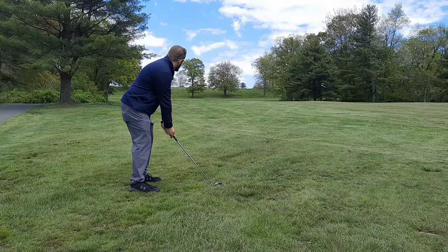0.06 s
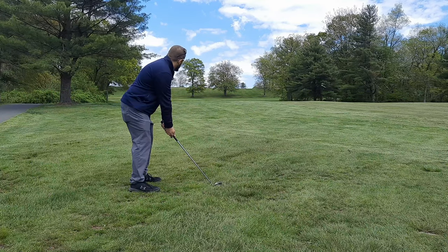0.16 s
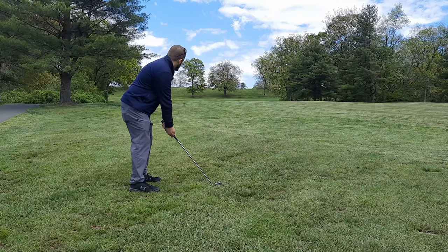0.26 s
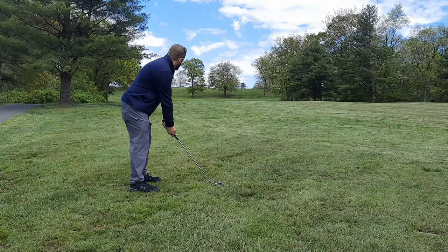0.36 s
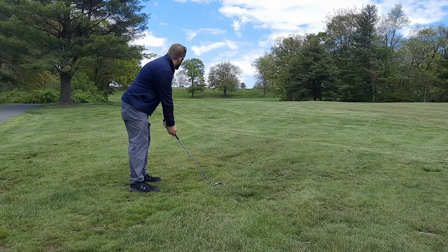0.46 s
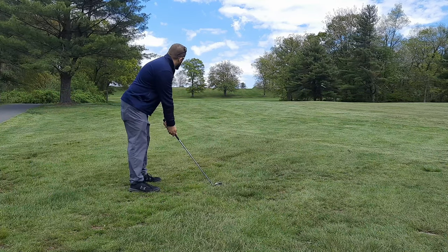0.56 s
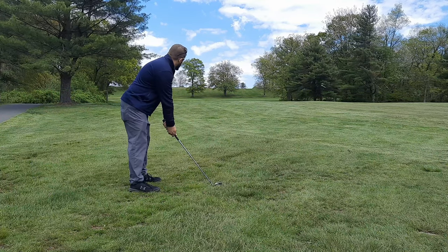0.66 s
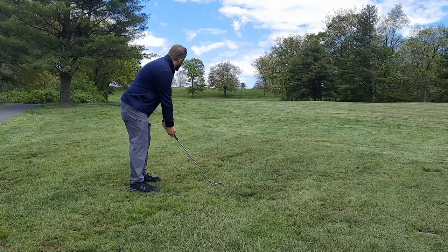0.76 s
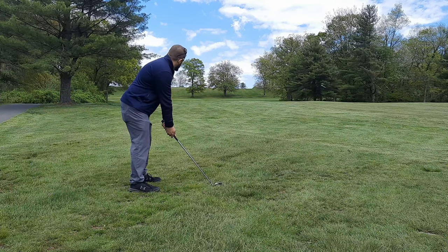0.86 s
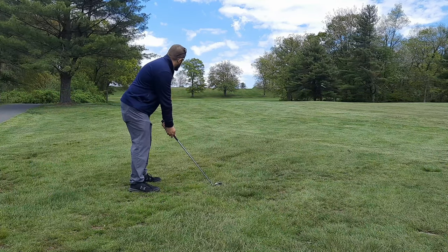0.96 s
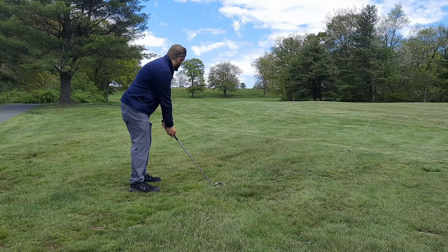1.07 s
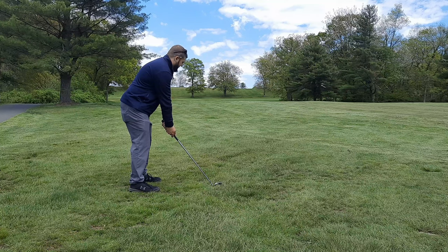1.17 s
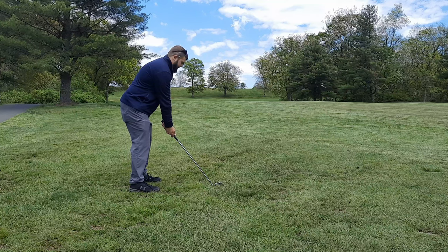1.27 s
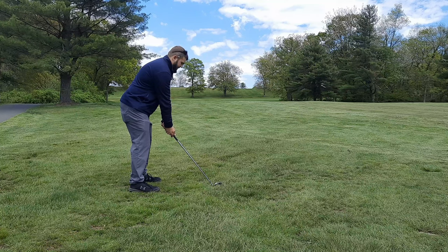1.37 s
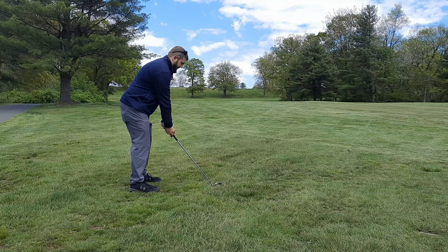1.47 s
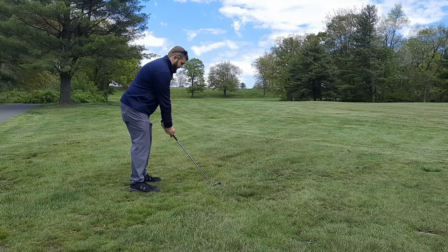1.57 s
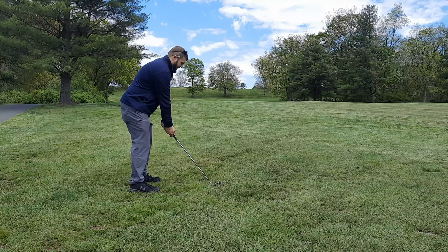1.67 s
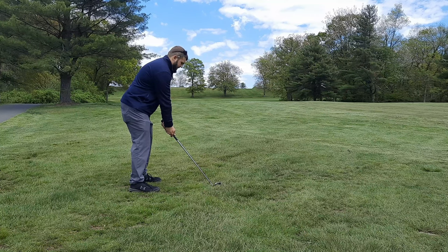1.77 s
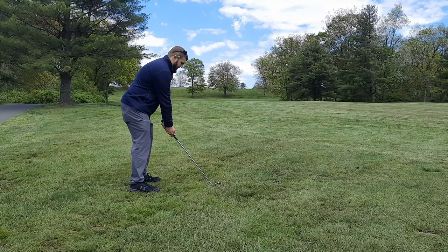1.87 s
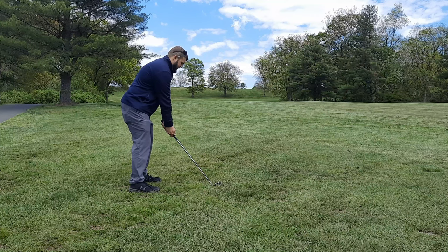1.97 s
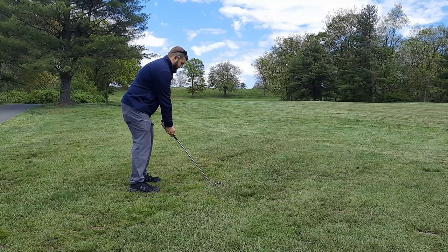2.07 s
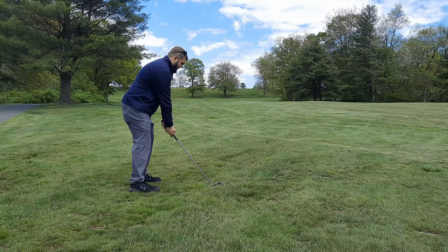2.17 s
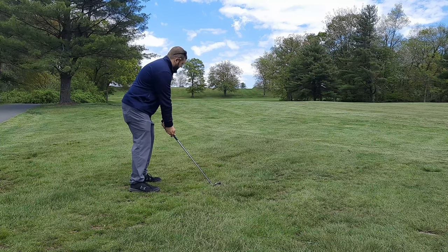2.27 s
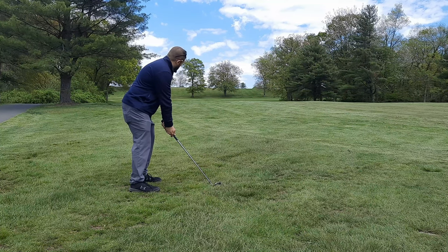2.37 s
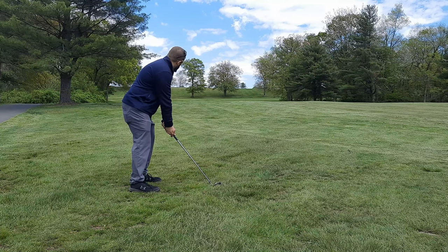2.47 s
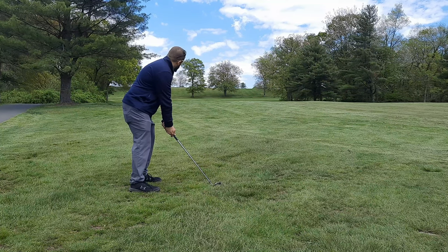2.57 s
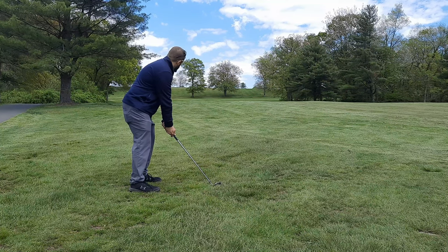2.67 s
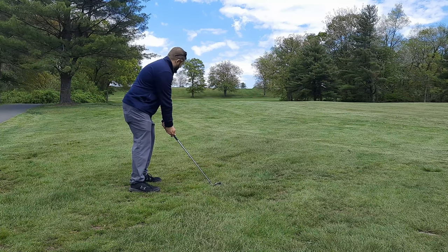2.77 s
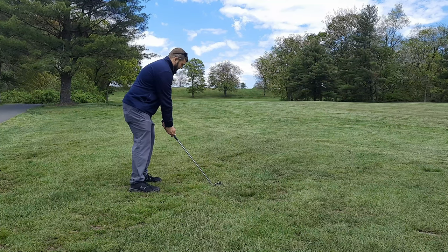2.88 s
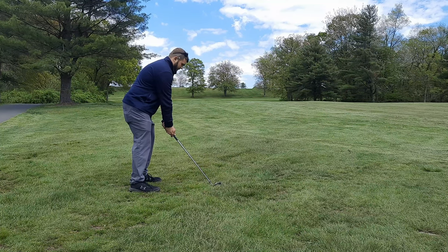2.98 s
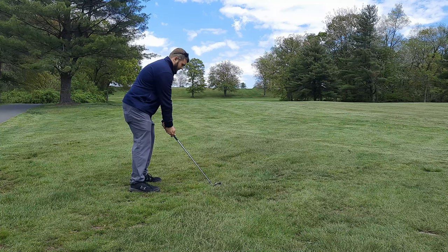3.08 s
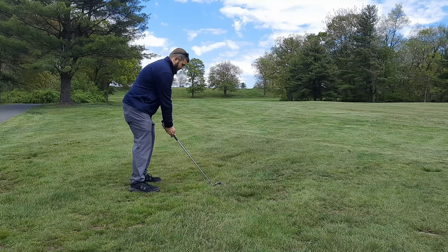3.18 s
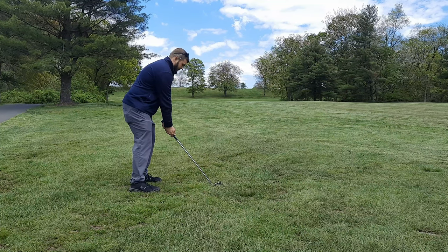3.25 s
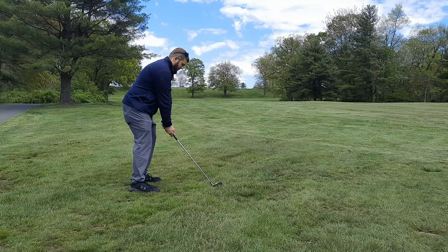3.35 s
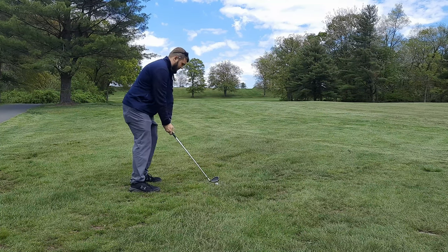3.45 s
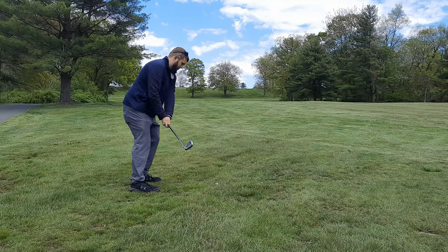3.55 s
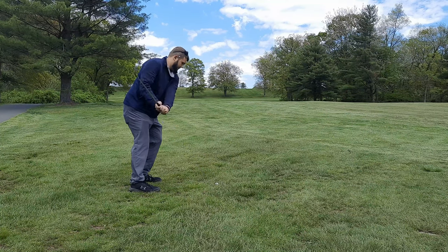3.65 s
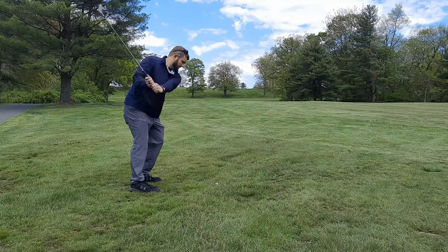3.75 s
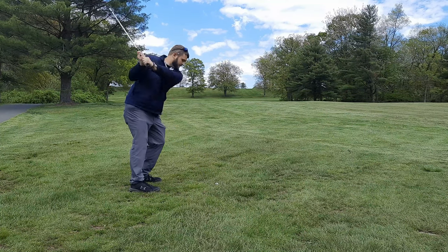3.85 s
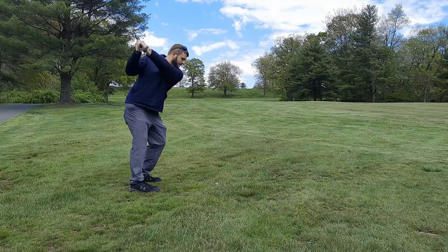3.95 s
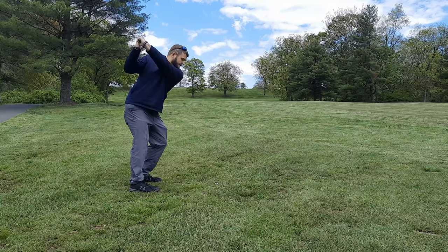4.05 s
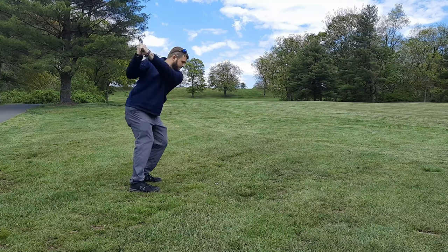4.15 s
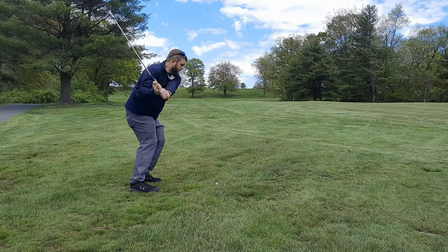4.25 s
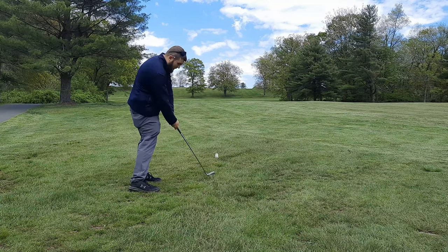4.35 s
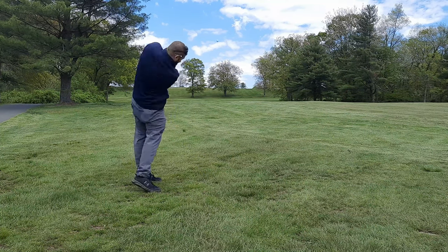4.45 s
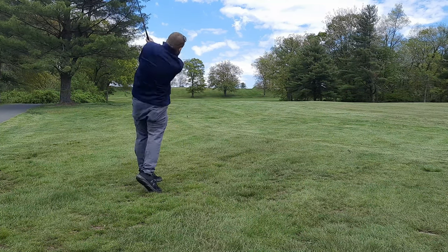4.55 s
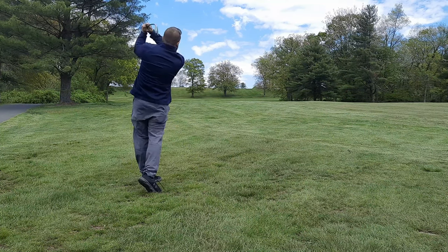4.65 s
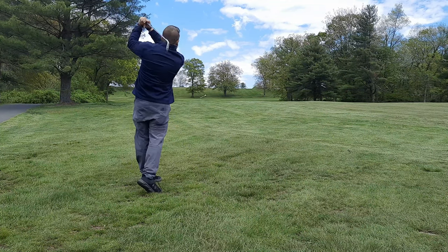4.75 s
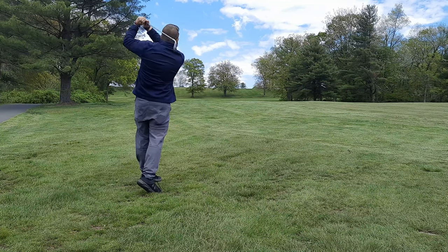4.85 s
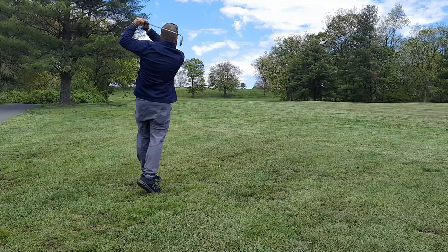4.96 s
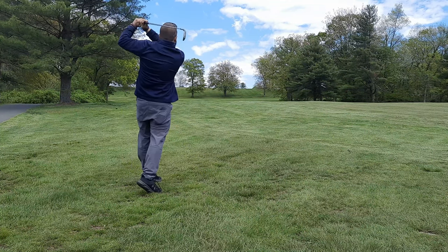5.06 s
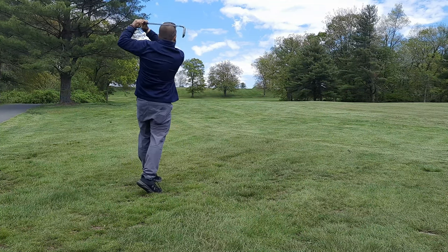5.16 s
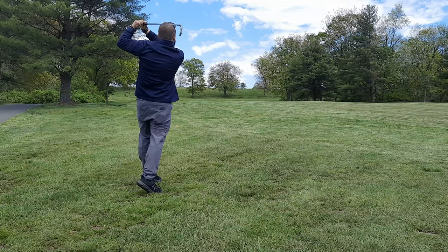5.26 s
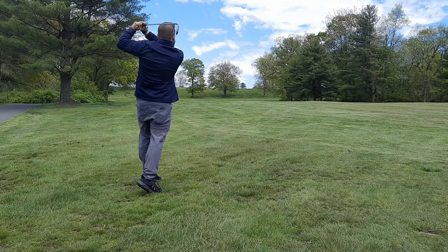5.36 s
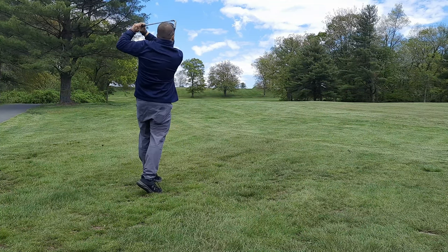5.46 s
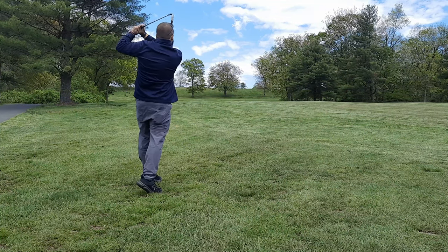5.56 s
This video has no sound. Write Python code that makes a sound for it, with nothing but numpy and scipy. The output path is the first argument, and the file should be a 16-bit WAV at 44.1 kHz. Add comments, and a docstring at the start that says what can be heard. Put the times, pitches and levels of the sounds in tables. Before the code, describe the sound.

Distant lawn mowers hum steadily on an open fairway, with a faint thin whine and a few tiny bird chirps. After about four seconds a golf club swishes down and hits the ball with one sharp crack, thumping and tearing the turf. Bits of grass patter down, the trees return a faint dull echo, and a bird softly whistles twice. The stereo microphone stands a few metres away.

```python
"""Iron shot on a quiet fairway

A stereo microphone stands a few metres from the ball. Far off to the left mowers hum, with a thin
whine behind them, and small birds call from the trees. The club brushes the grass on the takeaway,
swishes down, cracks against the ball and tears into the turf. Bits of grass fall back, the tree line
returns a dull echo and the golfer's shoe and clothes settle."""
import sys
import numpy as np
from scipy import signal
from scipy.fft import rfft, irfft, next_fast_len
from scipy.io import wavfile

SR = 44100
rng = np.random.default_rng(int(sys.argv[2]) if len(sys.argv) > 2 else 0)


def unload_wav(signal):
    """Save mono or channel-first audio to the path in sys.argv[1] as 16-bit WAV at rate SR, clipped to [-1, 1]."""
    wavfile.write(
        sys.argv[1],
        SR,
        np.round(np.clip(np.atleast_2d(signal).T, -1, 1) * 32767).astype(np.int16),
    )


N = 247785
TIME = np.arange(N) / SR
IMPACT_S = 4.5014
MOWER_LAG_S = .00052   # the mowers reach the right channel this much later

# distant rumble: (frequency [Hz], relative level [dB])
RUMBLE_SPECTRUM = [(20, -23), (38, -16), (60, 1.5), (95, -3.5), (125, 5), (170, -6.5), (215, -9),
                   (280, -2.5), (340, -7.5), (410, -15), (520, -22.5), (660, -24.5), (900, -28),
                   (1400, -45.5)]
# open air and leaves: (frequency [Hz], relative level [dB])
AIR_SPECTRUM = [(300, 1), (800, 8), (1500, -4.5), (2150, -5), (2800, -9.5), (4500, -15), (7000, -18.5),
                (9500, -21), (12500, -16.5), (15500, -16.5)]
# stereo width of far sounds: (frequency [Hz], side minus mid [dB])
FAR_WIDTH = [(60, -22.5), (150, -9.5), (350, -5.5), (1000, -6.5), (2500, -1.5), (6000, 0.5)]
# stereo width at the golfer's spot: (frequency [Hz], side minus mid [dB])
NEAR_WIDTH = [(500, -12), (2000, -0.5), (4500, -1.5), (10000, -1)]
# the far whine's narrow, raspy band: (frequency [Hz], relative level [dB])
WHINE_SPECTRUM = [(1900, -40), (2090, -14), (2148, 0), (2210, -13), (2400, -40)]
# swells of the whine: (time [s], relative level [dB], hold [s])
WHINE_SURGES = [(1.48, -92, .09), (3.133, -82, .34)]
# the far engine's firing tone fading in and out: (time [s], level [dB])
FIRING_LEVELS = [(0, -45), (0.55, -45.0), (2.1, -49), (2.8, -42.5), (3.3, -44), (3.85, -41.1), (5.2, -54),
                 (5.62, -43.5)]
# its octave, fading on its own: (time [s], level [dB])
OCTAVE_LEVELS = [(0, -52), (0.75, -60), (1.25, -50.3), (1.65, -58), (2.25, -47), (3.1, -50), (4.15, -56.5),
                 (4.7, -47), (5.62, -50)]
# higher engine orders in the drone: (multiple of the firing rate, relative level [dB])
DRONE_ORDERS = [(3, -3), (4, -4), (5, -17), (8, -23)]
# one bird's long whistles, sagging onto their pitch: (time [s], relative level [dB])
BIRD_WHISTLES = [(4.75, -72), (5.172, -69.5)]
# another bird's short chirps: (time [s], relative level [dB], direction [+1 up, -1 down])
BIRD_CHIRPS = [(.298, -85, 1), (1.448, -79.5, 1), (1.535, -85, 1), (4.942, -82, 1), (5.285, -84, -1),
               (5.395, -84, -1)]
# the strike coming back from the trunks: (delay [s], relative level [dB])
TRUNK_ECHOES = [(.163, -45), (.2245, -34), (.2345, -38)]
# jacket sleeves sliding in the backswing: (frequency [Hz], relative level [dB])
SLEEVE_SPECTRUM = [(1200, -4), (2500, -4), (3600, -1.5), (4800, -15), (9000, -17.5)]
# shoe and clothes settling in the finish: (frequency [Hz], relative level [dB])
SETTLING_SPECTRUM = [(350, -10), (550, 0), (900, -0.5), (1400, -19.5), (3000, -25.5), (12000, -34)]
# the swish, with the shaft's whistle near 600 Hz: (frequency [Hz], relative level [dB])
SWISH_SPECTRUM = [(200, -16), (480, -6.5), (610, 3.5), (800, -13.5), (1100, -9), (1550, -5), (2900, -19),
                  (6500, -25.5), (9000, -36), (15000, -33.5)]
# grass brushed, torn and falling back, and the crack's short fizz: (frequency [Hz], relative level [dB])
GRASS_SPECTRUM = [(300, -6.5), (900, -6), (2500, 3.5), (4200, -3), (6500, -3), (9300, -13), (12500, -8.5),
                  (15500, -12.5)]
# the soil's thump: (frequency [Hz], relative level [dB])
SOIL_SPECTRUM = [(110, -1), (135, 1), (220, -7), (335, 3), (430, -4), (520, -6), (680, -3), (1200, -20)]
# tufts of the divot landing: (time [s], level [dB])
FALLING_TUFTS = [(4.637, -57.5), (4.686, -67), (4.779, -70)]
# the head hitting ball and ground: (time [s], snap level [dB], relative ring level [dB])
HEAD_CONTACTS = [(4.50119, -0.5, -16), (4.5021, -9, -22.5), (4.511, -20, -32)]
# ringing modes of head and ball: (frequency [Hz], relative level [dB], t60 [s])
HEAD_BALL_MODES = [(325, -14, .06), (690, 2, .017), (1090, 1, .017), (1500, -8, .009), (2060, 5, .016),
                   (2550, -11, .045), (2790, -14, .04), (3260, -10, .014), (4100, -18, .022),
                   (4640, -16, .016), (5850, -12, .012), (6650, -14, .018), (7810, -15, .022),
                   (11700, -21, .025), (12700, -18, .022)]


def from_db(db):
    """Decibels to gain."""
    return 10 ** (np.asarray(db) / 20)


def unit_rms(x):
    """Scale to rms 1."""
    return x / np.sqrt(np.mean(x ** 2) + 1e-20)


def at_hz(points, hz):
    """Read a spectrum on a log-frequency axis."""
    point_hz, level_db = np.transpose(points)
    return np.interp(np.log(hz), np.log(point_hz), level_db)


def drift(rate):
    """A smooth random curve of rms about 1, changing about `rate` times a second."""
    step, run_in = 40, 2000
    pole = np.exp(-2 * np.pi * rate * step / SR)
    white = rng.standard_normal(N // step + run_in + 2)
    slow = signal.lfilter([1], [1, -2 * pole, pole ** 2], white)[run_in:]
    return np.interp(np.arange(N) / step, np.arange(len(slow)), unit_rms(slow))


def noise(spectrum, width=NEAR_WIDTH, tilt_db=0, lag_s=0):
    """Coloured stereo noise of rms 1, tilted by tilt_db per octave, the right channel lag_s later."""
    size = next_fast_len(N)
    hz = np.maximum(np.arange(size // 2 + 1) * SR / size, 1)
    skirts = np.minimum(hz / spectrum[0][0], 1) ** 2 * np.minimum(spectrum[-1][0] / hz, 1) ** 2
    gain = skirts * from_db(at_hz(spectrum, hz) + tilt_db * np.log2(hz))
    mid, side = rfft(rng.standard_normal((2, size)))
    spread = from_db(at_hz(width, hz))
    left = mid + spread * side
    right = (mid - spread * side) * np.exp(-2j * np.pi * hz * lag_s)
    return unit_rms(irfft(gain * np.array([left, right]) / np.sqrt(1 + spread ** 2), size)[:, :N])


def burst(peak_s, level_db, rise, t60, hold=0):
    """An envelope that climbs its last 10 dB in `rise` seconds, holds and dies away."""
    early = np.maximum(peak_s - TIME, 0)
    late = np.maximum(TIME - peak_s - hold, 0)
    return from_db(level_db - np.minimum(60 * late / t60 + 10 * (early / rise) ** 2, 200))


def ring(clicks, hz, t60):
    """A unit click sets a sine of height 1 ringing."""
    radius, angle = 10 ** (-3 / (t60 * SR)), 2 * np.pi * hz / SR
    feedback = [1, -2 * radius * np.cos(angle), radius ** 2]
    return signal.lfilter([0, np.sin(angle)], feedback, clicks + 1e-18)


def far_tone(hz):
    """A stereo sine of rms 1 on a pitch curve, arriving from the mowers' side."""
    cycles = np.cumsum(hz) / SR + rng.random()
    return np.sqrt(2) * np.sin(2 * np.pi * np.array([cycles, cycles - hz * MOWER_LAG_S]))


def delayed(x, seconds):
    """A mono sound, later."""
    return np.interp(TIME - seconds, TIME, x, left=0)


def scattered(x, envelope):
    """Countless small reflections from leaves and branches, arriving under a one-second envelope."""
    reflections = unit_rms(rng.standard_normal((2, SR)) * envelope) / np.sqrt(SR)
    return signal.fftconvolve(x[None], reflections, axes=1)[:, :N]


def open_air(rumble_db=-47, hiss_db=-71):
    """The bed of the place: low rumble from the mowers' side under a thin hiss of air and leaves."""
    rumble = from_db(rumble_db + .4 * drift(5.1)) * noise(RUMBLE_SPECTRUM, FAR_WIDTH, lag_s=MOWER_LAG_S)
    hiss = from_db(hiss_db + .19 * drift(1.7)) * noise(AIR_SPECTRUM, FAR_WIDTH, lag_s=MOWER_LAG_S)
    return rumble + hiss


def whine(pitch_hz=2150, jitter_hz=38, grow_db_per_s=1.6):
    """A thin, far tone with a raspy fringe, slowly growing and swelling twice."""
    floor = from_db(-96 + grow_db_per_s * TIME)
    swells = sum(burst(s, level_db, rise=.13, t60=.5, hold=hold) for s, level_db, hold in WHINE_SURGES)
    line = from_db(-2) * far_tone(pitch_hz + jitter_hz * drift(110))
    rasp = from_db(-4) * noise(WHINE_SPECTRUM, FAR_WIDTH)
    return (floor + swells) * (line + rasp)


def mowers(engine_hz=77.56, blade_hz=326.9, recede_at_s=2.4, recede_db_per_s=2):
    """Engine orders and blade drone, each wavering on its long way through moving air."""
    firing_hz = engine_hz + .1 * drift(2)
    firing_db = np.interp(TIME, *np.transpose(FIRING_LEVELS))
    octave_db = np.interp(TIME, *np.transpose(OCTAVE_LEVELS))
    drone_db = -52.5 - recede_db_per_s * np.maximum(TIME - recede_at_s, 0)
    engine = from_db(firing_db + .42 * drift(3.9)) * far_tone(firing_hz)
    engine += from_db(octave_db + .42 * drift(1.4)) * far_tone(2 * firing_hz)
    for multiple, level_db in DRONE_ORDERS:
        engine += from_db(drone_db + level_db - .24 * drift(4.8)) * far_tone(multiple * firing_hz)
    blades = from_db(drone_db + 1.1 - .24 * drift(3.9)) * far_tone(blade_hz + .7 * drift(3.6))
    return engine + blades


def bird_note(start_s, length_s, start_hz, end_hz, level_db, settle_s=.019):
    """One whistled note: it swells, settles on its end pitch and fades."""
    age = np.arange(int(length_s * SR)) / SR
    progress = age / length_s
    hz = end_hz + (start_hz - end_hz) * (1 - progress) * np.exp(-(age / settle_s) ** 2 / 2)
    envelope = from_db(level_db) * np.sin(np.pi * progress ** .51) ** 2
    note = envelope * np.sqrt(2) * np.sin(2 * np.pi * np.cumsum(hz) / SR)
    return np.pad(note, (int(start_s * SR), N))[:N]


def birds(chirp_hz=5750, sweep_hz=1500, flutter_db=2.5, far_notes=22, trees_t60=.5):
    """Two nearer birds whistle and chirp; a far twitter reaches the microphone only off the trees."""
    song = sum(bird_note(s, length_s=.17, start_hz=4840, end_hz=4685, level_db=level_db)
               for s, level_db in BIRD_WHISTLES)
    for s, level_db, direction in BIRD_CHIRPS:
        reach_hz = direction * sweep_hz / 2
        song += bird_note(s, .037, chirp_hz - reach_hz, chirp_hz + reach_hz, level_db, settle_s=.05)
    song *= from_db(flutter_db * drift(30))
    twitter = np.zeros(N)
    for when, length, pitch, glide in rng.random((far_notes, 4)):
        start_hz = 2200 * 2 ** (.8 * pitch)
        end_hz = start_hz * 2 ** (.3 * (glide - .5))
        twitter += bird_note(when * N / SR, .03 + .074 * length, start_hz, end_hz, level_db=-84)
    blur = scattered(song + twitter, from_db(-60 * TIME[:SR] / trees_t60))
    return from_db(-3.5) * song + from_db(-5) * blur


def tree_line(strike, blur_delay_s=.13, blur_spread_s=.055):
    """Trunks return distinct echoes, foliage a blur; distance and soft ground leave the middle band."""
    middle_band = signal.butter(2, [800, 2600], "band", fs=SR, output="sos")
    dulled = signal.sosfilt(middle_band, strike.mean(axis=0))
    trunks = sum(from_db(level_db - 1.5) * delayed(dulled, lag) for lag, level_db in TRUNK_ECHOES)
    arrivals = np.exp(-((TIME[:SR] - blur_delay_s) / blur_spread_s) ** 2 / 2)
    return trunks + from_db(-38) * scattered(dulled, arrivals)


def clothes(backswing_s=3.6, finish_s=5.24, rustle_db=1):
    """A few metres off, sleeves slide in the backswing; shoe and clothes settle in the finish."""
    sleeves = burst(backswing_s, level_db=-80, rise=.16, t60=2.6, hold=.5) * noise(SLEEVE_SPECTRUM)
    settling = burst(finish_s, level_db=-63, rise=.12, t60=1.5) * noise(SETTLING_SPECTRUM)
    return (sleeves + settling) * from_db(rustle_db * drift(25))


def swish(peak_s=4.469, peak_db=-40.5, rise_db_per_s=541.5, fall_db_per_s=291.5, flutter_db=1.5):
    """Shaft and head shed eddies, growing with the club's speed to a peak just before the ball."""
    below_peak_db = np.maximum(rise_db_per_s * (peak_s - TIME), fall_db_per_s * (TIME - peak_s))
    downswing = from_db(peak_db - np.minimum(below_peak_db, 200))
    follow_through = burst(IMPACT_S, level_db=-65.5, rise=.028, t60=.66, hold=.24)
    return (downswing + follow_through) * from_db(flutter_db * drift(120)) * noise(SWISH_SPECTRUM)


def grass(takeaway_s=3.522, grain_db=.5):
    """The head brushes the grass going back, then shears blades, drags through roots and throws tufts; a short
    bright fizz rides on the crack of the first contact."""
    brush = burst(takeaway_s, level_db=-67.5, rise=.049, t60=.3)
    shear = burst(IMPACT_S, level_db=-25.5, rise=.008, t60=.025, hold=.0105)
    fizz = burst(IMPACT_S, level_db=-15, rise=.0006, t60=.019)
    roots = burst(IMPACT_S, level_db=-37, rise=.0036, t60=.036, hold=.0255)
    spray = burst(IMPACT_S, level_db=-64.5, rise=.02, t60=1.27, hold=.055)
    tufts = sum(burst(s, level_db, rise=.007, t60=.24) for s, level_db in FALLING_TUFTS)
    rustle = (brush * noise(GRASS_SPECTRUM, tilt_db=8)
              + shear * noise(GRASS_SPECTRUM, tilt_db=2.4)
              + fizz * noise(GRASS_SPECTRUM, tilt_db=1.2)
              + roots * noise(GRASS_SPECTRUM, tilt_db=-3)
              + spray * noise(GRASS_SPECTRUM, tilt_db=3)
              + tufts * noise(GRASS_SPECTRUM, tilt_db=6))
    return rustle * unit_rms(from_db(grain_db * drift(300)))


def soil():
    """The ground takes the blow with a noisy thump and one short, low thud."""
    thump = burst(IMPACT_S, level_db=-24, rise=.006, t60=.08) * noise(SOIL_SPECTRUM)
    blow = signal.unit_impulse(N, int(IMPACT_S * SR))
    return thump + from_db(-31) * ring(blow, hz=122, t60=.11)


def crack(snap_hz=1700, snap_t60=.0017):
    """Each contact sends out one sharp pressure swing and sets head and ball ringing briefly."""
    contact_s, snap_db, ring_db = np.transpose(HEAD_CONTACTS)
    at = np.round(contact_s * SR).astype(int)
    snaps, blows = np.zeros((2, N))
    snaps[at] = from_db(snap_db)
    blows[at] = from_db(ring_db + 2.5)
    pulse = ring(snaps, snap_hz, snap_t60)
    front = np.diff(pulse, prepend=0) * SR / (2 * np.pi * snap_hz)
    pressure = .45 * front - pulse   # a steep front, then suction
    for k, (hz, level_db, t60) in enumerate(HEAD_BALL_MODES):
        pressure += (-1) ** k * from_db(level_db) * ring(blows, hz, t60)
    return np.array([pressure, delayed(pressure, 2 / SR)])   # the ball lies a little to the left


def scene(pan_db=.45):
    """The fairway as it reaches the microphone, leaning slightly to the left."""
    ambience = mowers() + whine() + open_air() + birds()
    swing = swish() + clothes()
    strike = grass() + soil() + crack()
    return (ambience + swing + strike + tree_line(strike)) * from_db([[pan_db], [-pan_db]])


def record(dry):
    """The top is cut steeply above 15.6 kHz."""
    return signal.sosfilt(signal.ellip(10, .2, 80, 15600, fs=SR, output="sos"), dry)


dry = scene()
out = record(dry)
unload_wav(out)
```